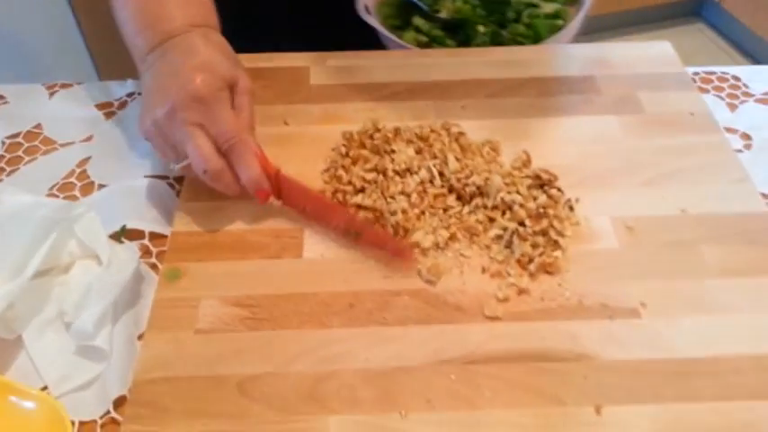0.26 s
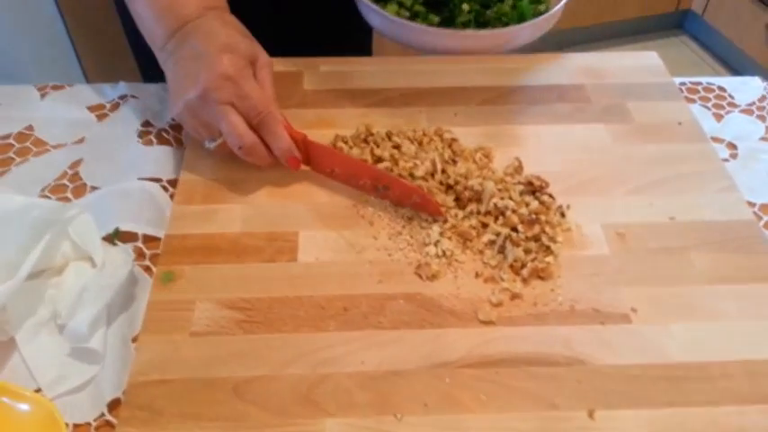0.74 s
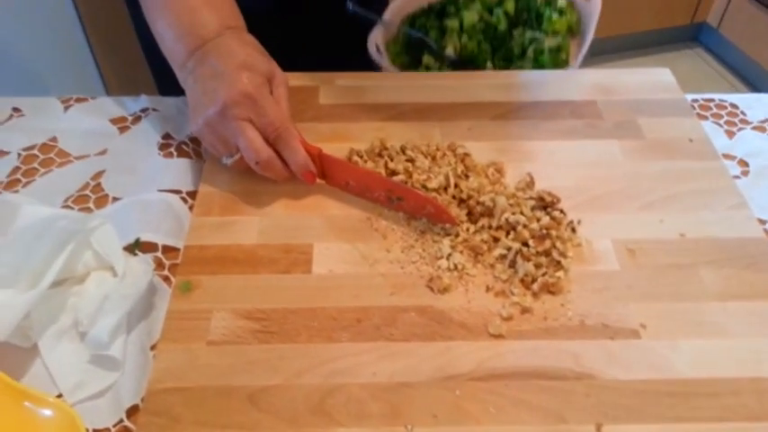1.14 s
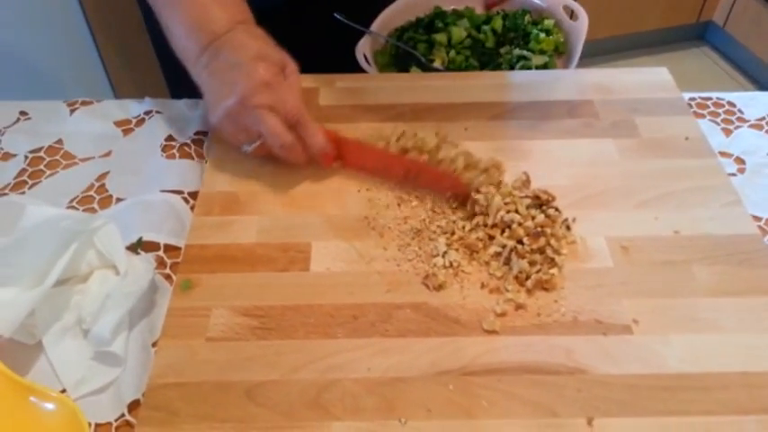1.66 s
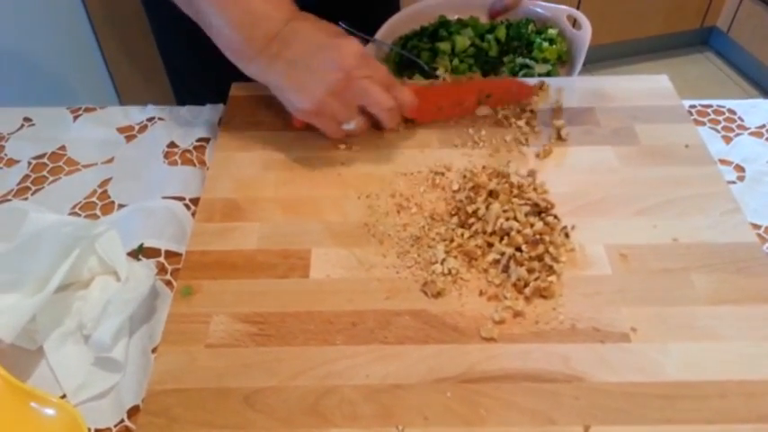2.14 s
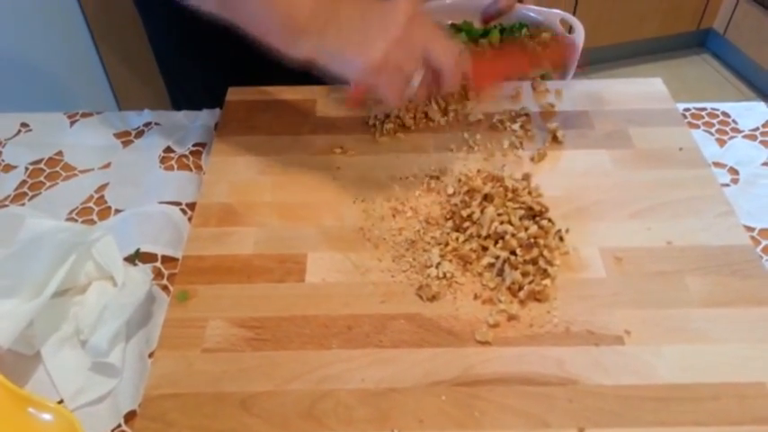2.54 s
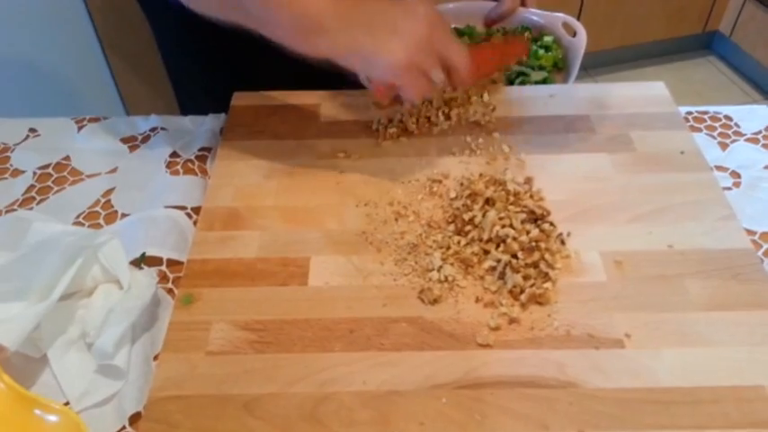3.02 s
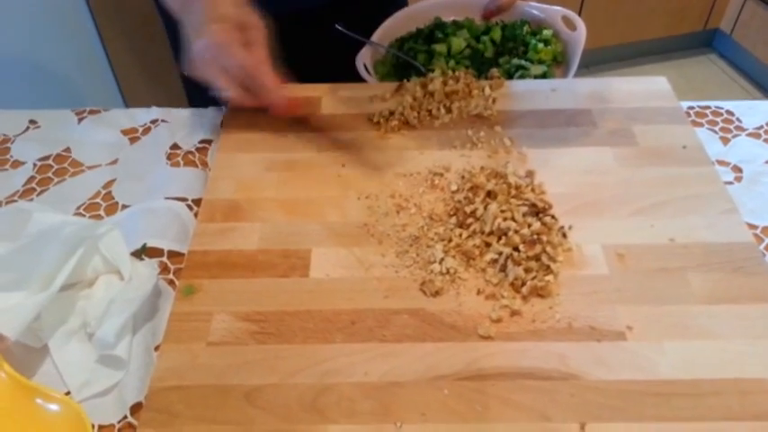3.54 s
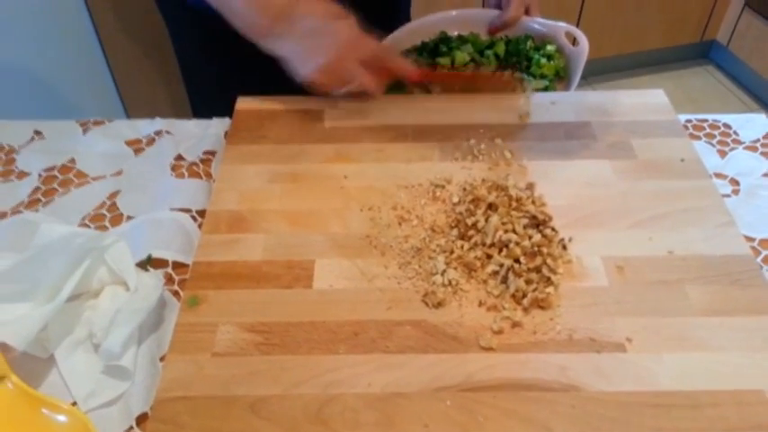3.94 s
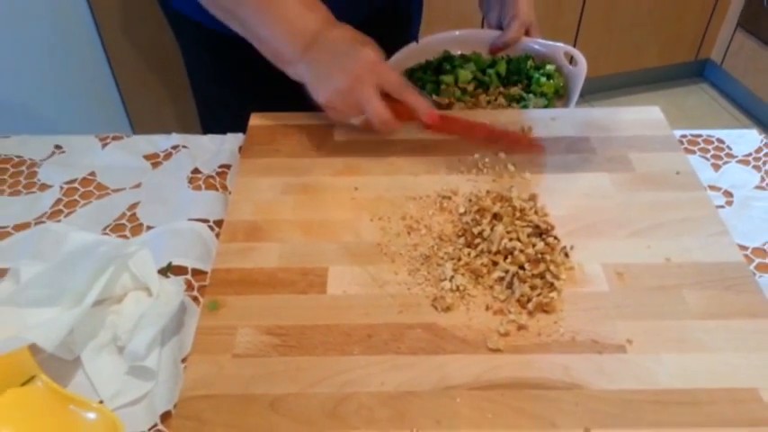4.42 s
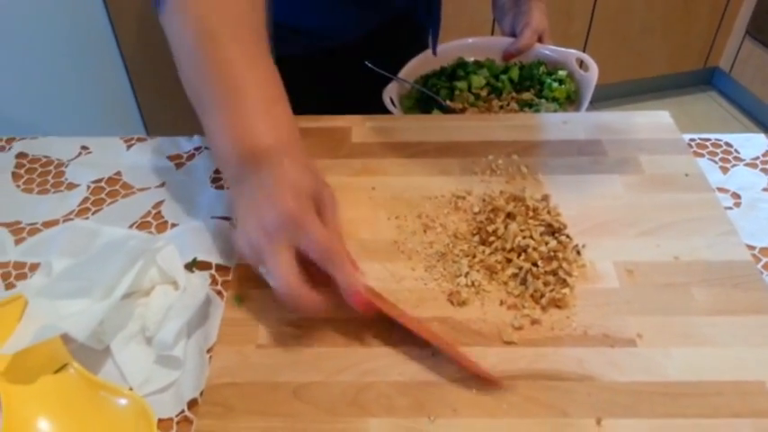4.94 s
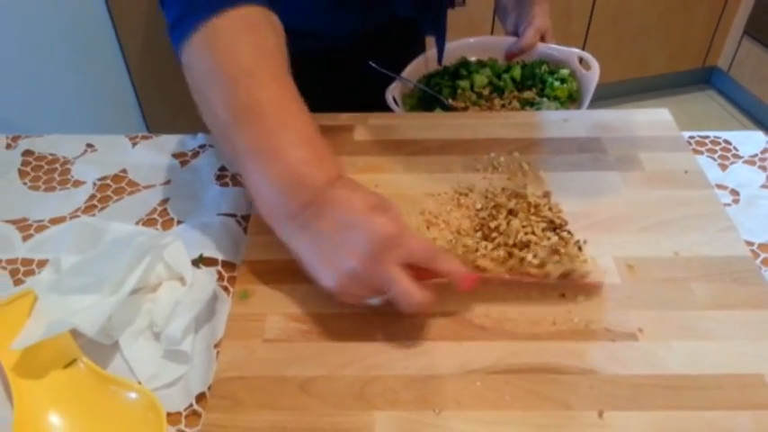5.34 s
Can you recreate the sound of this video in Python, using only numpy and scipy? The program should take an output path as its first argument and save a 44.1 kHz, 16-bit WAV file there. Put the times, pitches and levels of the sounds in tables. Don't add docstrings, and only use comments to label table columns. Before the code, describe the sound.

In a small kitchen with a steady low appliance hum, a steel blade scrapes chopped nuts over a wooden board. A short scrape and light clinks come first, then a near pause, longer rasping sweeps, delicate spoon-on-bowl clinks, a strong scrape with knocks, and finally a cluster of hard woody raps and another rasp. Close microphone, short room reverberation.

```python
import sys
import numpy as np
from scipy import signal
from scipy.io import wavfile

SR = 44100
rng = np.random.default_rng(int(sys.argv[2]) if len(sys.argv) > 2 else 0)


def master_out(mix):
    frames = np.transpose(np.atleast_2d(mix))
    ceiling = np.clip(frames, -1, 1)
    pcm = np.round(ceiling * 32767).astype(np.int16)
    wavfile.write(sys.argv[1], SR, pcm)


def ratio_of_db(decibels):
    return 10 ** (np.asarray(decibels, float) / 20)


N = 245637

STILL_DB = -98
# [f/Hz, width/Hz, level/dB]
BOARD_MODES = [(369, 11, -8.5), (488, 110, -7.5), (646, 26.4, -1), (699, 22, 1), (800, 38.5, 0),
               (898, 16, -6.5), (1086, 134, -9.5)]
PASS_ENDS = [1.3, 2.7, 3.3, 3.81, 4.8, 5.08, 5.385]
# [t/s, peak level/dB, top ring over it/dB]
SNAG_EVENTS = [(0.281, -26, -14), (0.31, -25, -14), (0.3342, -28.5, -21), (0.46, -36, -10),
               (0.4994, -45, -23), (0.5583, -27, -25), (0.601, -33, -20), (1.5153, -36, -6),
               (1.524, -36, -7), (1.5362, -37, -5), (1.555, -35, -6), (1.578, -29.5, -9), (1.6006, -30, -9),
               (1.621, -41, -2), (1.6594, -35, -11), (1.6894, -40, -9), (1.7284, -37, -14),
               (1.7504, -35, -18), (1.775, -23, -18), (1.796, -22, -21), (1.828, -26, -21),
               (1.853, -28, -18), (1.9031, -29, -12), (1.924, -28, -11), (2.7994, -38, -20),
               (2.8294, -41, -19), (2.868, -29, -20), (2.909, -28, -34), (3.532, -25, -14),
               (3.5787, -17, -17), (3.6594, -20, -21), (3.7094, -16, -22), (3.769, -28, -34),
               (3.8, -18, -30), (3.8205, -20, -26), (3.8444, -27, -23), (3.8701, -10, -21),
               (4.9644, -32, -33), (4.9844, -30, -26), (4.9994, -31, -23), (5.018, -20, -18),
               (5.0394, -18.5, -16.5), (5.3094, -33, -8), (5.33, -29, -14), (5.4196, -27, -16),
               (5.432, -15, -20), (5.459, -19, -27), (5.4894, -34, -27), (5.5328, -26, -22)]


def rms_one(x):
    return x / np.sqrt(np.mean(x ** 2) + 1e-20)


def drift(rate):
    knots = rng.standard_normal(400)
    return np.interp(np.arange(N) / SR * rate, np.arange(400), knots)


def resonate(x, peaks, wander_db=0., rate=7.4):
    out = 0
    for k, (hz, width_hz, db) in enumerate(peaks):
        radius = np.exp(-np.pi * width_hz / SR)
        b = (1 - radius ** 2) / 2 * np.array([1, 0, -1])
        a = [1, -2 * radius * np.cos(2 * np.pi * hz / SR), radius ** 2]
        drive = x * ratio_of_db(db + wander_db * drift(rate)[:len(x)])
        out = out + (-1) ** k * signal.lfilter(b, a, drive)
    return out


def band(x, low_hz, high_hz, order=2):
    edges = [low_hz, min(high_hz, .45 * SR)]
    return signal.sosfilt(signal.butter(order, edges, "band", fs=SR, output="sos"), x)


def coloured(spectrum, per_octave):
    hz, db = np.transpose(spectrum)
    edges = hz[0] * 2 ** np.arange(0, np.log2(hz[-1] / hz[0]), 1 / per_octave)
    white = rng.standard_normal((2, N + SR // 4))
    centres = edges * 2 ** (.5 / per_octave)
    gains = ratio_of_db(np.interp(np.log(centres), np.log(hz), db))
    out = 0
    for k, (low_hz, gain) in enumerate(zip(edges, gains)):
        out = out + gain * band(white[k % 2], low_hz, low_hz * 2 ** (1 / per_octave))
    return rms_one(out[-N:])


def strikes(times, db):
    clicks = np.zeros(N)
    clicks[(np.array(times) * SR).round().astype(int)] = ratio_of_db(db)
    return clicks


def catches(per_s, spread_db, clump_db):
    born = rng.random(N) < per_s / SR
    sizes = ratio_of_db(spread_db * np.minimum(rng.exponential(1, N), 5)) * rng.choice([-1, 1], N)
    return rms_one(born * sizes * ratio_of_db(clump_db * drift(60.)))


def contact(start, length, first_db, last_db):
    attack_s, release_db_per_s = .012, 242
    t = np.arange(0, N, 32) / SR - start
    glide = first_db + (last_db - first_db) * np.clip(t / length, 0, 1)
    db = glide - release_db_per_s * np.maximum(t - length, 0) + 40 * np.minimum(t / attack_s, 0)
    return ratio_of_db(np.maximum(2 * db, 2 * STILL_DB - 40))


def full_rate(curve):
    return np.interp(np.arange(N), np.arange(0, N, 32), curve)


def room_tone():
    # [f/Hz, level per Hz/dB]
    air_spectrum = [(240, -64), (400, -9.5), (942, -17.5), (1260, -24), (2790, -27), (4280, -35),
                    (13300, -36.5), (14800, -24), (15400, -79)]
    return ratio_of_db(-53) * coloured(air_spectrum, per_octave=1.99)


def rumble():
    # [t/s, level/dB]
    load = [(0.0, -36.5), (0.06, -43), (0.11, -34), (0.17, -34.5), (1.16, -35.5), (1.19, -27),
            (1.32, -34.5), (2.31, -33.5), (2.42, -29.5), (2.56, -34.5), (3.4, -28), (3.44, -36.5),
            (3.52, -26.5), (4.33, -34.5), (4.39, -29.5), (5.57, -28.5)]
    # [f/Hz, level per Hz/dB]
    drone = [(118, -9), (135, -7.5), (150, 4), (168, -8.5), (190, -3.5), (250, -9), (330, -16),
             (450, -30.5)]
    # [f/Hz, level per Hz/dB]
    deep_spectrum = [(36, -39), (48, -12), (58, -3.5), (76, -13), (95, 5.5), (112, -2), (125, -14.5)]
    # [t/s, level/dB, half length/s]
    shudders = [(0.074, -37, 0.048), (1.356, -40.5, 0.18), (1.658, -36.5, 0.058), (3.502, -42, 0.3),
                (4.26, -31, 0.11), (4.694, -26.5, 0.12), (4.967, -32.5, 0.023), (5.158, -42, 0.19),
                (5.557, -39, 0.14)]
    t = np.arange(N) / SR
    load_db = np.interp(t, *np.transpose(load))
    swell = sum(ratio_of_db(2 * db) * np.exp(-((t - s) / half) ** 2) for s, db, half in shudders)
    steady_db = -43.5 + 0.1 * (load_db - load_db.mean())
    deep = np.sqrt(ratio_of_db(2 * steady_db) + swell)
    return ratio_of_db(load_db - 1.0) * coloured(drone, per_octave=8) + deep * coloured(deep_spectrum, per_octave=6.2)


def swings(rows):
    out, t = np.zeros(N), np.arange(SR // 5) / SR
    for s, db, hz, t60 in rows:
        swell = np.minimum(t * hz * .6, 1)
        swing = swell * np.sin(2 * np.pi * hz * t) * (1 - 5 * t)
        out[round(s * SR):][:len(t)] += ratio_of_db(db - 60 * t / t60) * swing
    return out


def thumps():
    # [t/s, peak level/dB, f/Hz, t60/s]
    raps = [
        (0.109, -23, 301, 0.056),
        (1.1919, -16.5, 184, 0.069),
        (1.188, -30, 1050, .02),
        (1.719, -28, 330, .06),
        (4.41, -12, 1030, .012),
        (4.927, -15, 1000, 0.014),
        (5.1452, -16, 810, 0.018),
    ]
    return swings(raps)


def sings():
    # [t/s, peak level/dB, f/Hz, t60/s]
    brushed = [
        (0.96, -61, 3240, .5),
        (1.005, -62, 3238, .25),
        (1.724, -38, 5600, .06),
        (1.725, -40, 1990, .08),
        (4.988, -34, 4130, .06),
        (5.008, -32, 4140, .08),
        (5.054, -30, 4150, .04),
    ]
    return swings(brushed)


def bumps():
    # [t/s, level/dB, upper body/dB]
    handle_knocks = [
        (1.188, -22.5, -13),
        (3.384, -16, 4.5),
    ]
    # [f/Hz, width/Hz, level/dB]
    bump_body = [(1110, 350, 6.5), (1830, 200, 2)]
    out, t = 0, np.arange(SR // 4) / SR
    for s, db, upper_db in handle_knocks:
        burst = rng.standard_normal(len(t)) * (ratio_of_db(-60 * t / 0.0061) + ratio_of_db(-16.0 - 60 * t / 0.22))
        lower, (high_hz, high_width, high_db) = bump_body
        woody = resonate(burst, [lower, (high_hz, high_width, high_db + upper_db)])
        woody = band(woody, 800, 2200, order=4)
        out = out + signal.oaconvolve(strikes([s], db + 3), woody)[:N]
    return out


def creep():
    spoon_modes = [(2370, 40, 0), (4820, 90, -3)]   # f/Hz, width/Hz, level/dB
    power = full_rate(contact(start=0.88, length=0.22, first_db=-68, last_db=-70))
    slips = catches(300, spread_db=3., clump_db=3.)
    return np.sqrt(power) * rms_one(resonate(slips, spoon_modes, wander_db=3.))


def clinks():
    # [t/s, high ring peak/dB, low ring over it/dB, middle ring over it/dB, share of the free decay]
    touches = [(0.1084, -40, 0, 4, .6), (0.118, -37, 1, 4, .85), (0.133, -43, 4, -2, .9),
               (0.796, -60, -9, -12, .7), (2.163, -53, 5, 3, .7), (2.4838, -52, -6, 1, .3),
               (2.7263, -55, 4, 1, .35), (3.0377, -50, 0, 1, .9), (3.0648, -56, 5, 3, .6),
               (3.1094, -43, 1, -3, 1.), (3.1433, -52, -6, -12, .6), (3.197, -54, 5, 7, .6),
               (3.885, -55, 11, -6, .7), (4.0167, -46, 8, 6, 1.), (4.041, -52, 10, 2, 1.),
               (4.061, -51, 7, 1, 1.)]
    # [f/Hz, level/dB, t60/s]
    bowl_modes = [(1725, -9, .2), (1965, -8, .18), (2640, -3, .32), (2715, -4, .25), (2790, -11, .2),
                  (3130, -6, .15), (3580, 1, .17), (3855, -2, .11), (4880, 0, .29), (5085, -16, .25),
                  (5490, -9, .15), (5765, -3, .13), (6520, -3, .13), (7820, -6, .2)]
    tilted_until_s = .5
    tilt_frees = [(2790, 10), (3580, 2), (4880, 0), (5085, 15), (5490, -5), (7820, -6)]
    out, t = np.zeros(N + SR), np.arange(SR // 3) / SR
    short = t[:SR // 10]
    hz, mode_db, t60 = np.transpose(bowl_modes)[:, :, None]
    for s, db, low_db, middle_db, free in touches:
        luck = rng.standard_normal((3, len(bowl_modes), 1))
        noise = rng.standard_normal((2, len(short)))
        spot_db = np.where(hz < 3000, low_db, np.where(hz < 4400, middle_db, 0))
        if s < tilted_until_s:
            spot_db = spot_db + sum(gain_db * (hz == f) for f, gain_db in tilt_frees)
        phase = 2 * np.pi * hz * (1 + .002 * luck[1]) * t
        fade = -60 * t / (t60 * np.clip(free, .1, 1.5))
        twin = np.sin((1.006 + .002 * luck[2]) * phase) * ratio_of_db(fade / .75)
        pair = np.sin(phase) * ratio_of_db(fade) + .8 * twin
        chatter = .04 * noise[0] * ratio_of_db(-60 * short / .1)
        chatter[0] = 1
        ring = np.sum(ratio_of_db(spot_db + mode_db - 5.5 + 1.5 * luck[0]) * pair, axis=0)
        hit = signal.oaconvolve(ring, chatter)
        hit[:len(short)] += band(ratio_of_db(-6) * noise[1] * ratio_of_db(-60 * short / 0.03), 2300, 6800)
        out[round(s * SR):][:len(hit)] += ratio_of_db(db) * hit
    return out[:N]


def ticks():
    # [t/s, peak level/dB, f/Hz]
    pieces = [(0.2788, -50, 7330), (0.4384, -54, 8200), (0.7944, -57, 5430), (0.944, -50, 1950),
              (1.3456, -55, 7060), (1.5249, -55, 7050), (1.5554, -54, 5100), (1.5994, -48, 5460),
              (1.8944, -42, 8200), (1.954, -38, 5000), (2.0513, -38.5, 4600), (2.2114, -51, 6800),
              (2.3521, -51, 5600), (2.4066, -48.5, 7330), (2.4294, -53, 6900), (2.4548, -46, 5950),
              (2.5544, -59, 3620), (2.5944, -63, 3590), (2.7994, -43, 4100), (2.8684, -39.5, 2970),
              (2.9387, -41, 6060), (3.3268, -51.5, 6410), (4.9265, -18, 4210), (4.946, -22.5, 4010),
              (4.999, -38, 7800), (5.0578, -33, 4950), (5.061, -31, 2200), (5.232, -36, 5240),
              (5.294, -25, 7130), (5.3986, -46, 5150)]
    out, t = np.zeros(N), np.arange(SR // 20) / SR
    for s, db, hz in pieces:
        at = round(s * SR)
        ring = np.sin(2 * np.pi * hz * t) * ratio_of_db(-60 * t / 0.023)
        splinter = band(rng.standard_normal(len(t)) * ratio_of_db(-60 * t / 0.018), 1220, 4800)
        out[at:at + len(t)] += ratio_of_db(db + 4.0) * (ring + 1.8 * splinter)
    return out


def knocks():
    # [t/s, peak level/dB, clatter over it/dB, crack over it/dB, thud over it/dB]
    landings = [(0.106, -29.5, 0.5, 6, 7.5), (0.1134, -23.5, -12, -1, -8), (1.187, -24.5, -9.5, -5, 0),
                (1.717, -22.5, -23, -23, -33), (3.384, -14, -21, -16, -7.5), (3.734, -17, -5, 5, -9),
                (3.751, -12.5, -27, -11, -12), (3.884, -17, -13, 3, -10), (4.410, -10, 1.5, 1.5, -16),
                (4.44, -15, 2.5, 5.5, -18), (4.473, -10.5, -1, 3.5, -10), (4.499, -36, 5, -19, -21),
                (4.925, -16, 5, -7, -11), (4.939, -9, -1, -20, -6.5), (5.085, -1, -20.5, -14.5, -10),
                (5.1, -24, -17, 9, -3), (5.109, -16, 0.5, 1, -10), (5.123, -16, -3, -2, -33),
                (5.144, -3.5, -8, -11.5, -8), (5.157, -9, -28, -17, -6.5), (5.171, -18, -12, 0, 4.5),
                (5.232, -14.5, -23, -7.5, -27), (5.265, -4, -9, -7.5, -19), (5.292, -15.5, -36, 2, -8)]
    # [f/Hz, width/Hz, level/dB]
    free_blade = [(4010, 150, 0), (4450, 300, 3), (5200, 200, -15), (5400, 150, -10), (6300, 250, 3),
                  (7820, 150, -3), (8450, 110, 13), (9100, 100, -6), (10100, 300, 7), (11800, 200, -2),
                  (12300, 150, 0), (13750, 150, -8), (14150, 150, -10)]
    board_t60_s = 0.039
    out, t = np.zeros(N), np.arange(SR // 4) / SR
    for s, db, clatter_db, crack_db, thud_db in landings:
        at = round((s + .001) * SR)
        chance = rng.standard_normal((3, len(t)))
        wood = 0
        for k, (hz, _, mode_db) in enumerate(BOARD_MODES):
            wood = wood + ratio_of_db(mode_db + 2 * chance[0, k]) * np.sin(2 * np.pi * hz * t)
        wood = band(wood * ratio_of_db(-60 * t / board_t60_s), 355, 1080)
        thud = sum(np.sin(2 * np.pi * hz * t) for hz in (190, 280, 375)) * ratio_of_db(-60 * t / 0.041)
        clatter = chance[2] * (ratio_of_db(-60 * t / 0.011) + ratio_of_db(-16.0 - 60 * t / 0.065))
        clatter = band(clatter, 570, 2196, order=4)
        burst = chance[1] * (ratio_of_db(-60 * t / 0.02) + ratio_of_db(-38 - 60 * t / 0.032))
        crack = band(burst, 1930, 6640) + ratio_of_db(-9.0) * resonate(burst, free_blade)
        hit = ratio_of_db(-10.5) * wood + ratio_of_db(thud_db - 6.5) * thud
        hit = hit + ratio_of_db(clatter_db + 11.0) * clatter + ratio_of_db(crack_db - 1.5) * crack
        out[at:at + len(t)] += ratio_of_db(db) * hit[:N - at]
    return out


def stroke_curves():
    # [t/s, length/s, first drag/dB, last drag/dB, weight on the board/dB]
    sweeps = [(0.0, 0.12, -43.5, -51.5, 0.5), (0.17, 0.09, -46, -46.5, -14), (0.262, 0.034, -41, -37, -2.5),
              (0.3, 0.18, -42.5, -47.5, 3), (0.43, 0.16, -41, -42, 2), (1.52, 0.17, -48.5, -39.5, 2),
              (1.72, 0.13, -35.5, -33.5, -0.5), (1.89, 0.055, -35.5, -32, -4.5),
              (1.99, 0.19, -41.5, -46, 0), (2.2, 0.12, -42.5, -51, -5), (2.38, 0.23, -48.5, -57, -7),
              (2.78, 0.084, -43, -39.5, -3), (2.88, 0.15, -40, -57, -2), (3.48, 0.063, -52.5, -31.5, -4),
              (3.55, 0.18, -32, -29.5, -3.5), (3.72, 0.12, -29, -34.5, 6.5), (3.82, 0.039, -30, -28, -20),
              (3.88, 0.15, -51, -41.5, -9), (4.44, 0.013, -33, -46, 18), (5.1, 0.074, -48, -40, 19),
              (5.29, 0.082, -30, -38, 7), (5.385, 0.28, -34, -29, 3)]
    # [t/s, length/s, first drag/dB, last drag/dB, weight on the board/dB]
    slides = [(0.125, 0.15, -46.5, -51, 2.5), (0.795, 0.057, -49.5, -54.5, 0),
              (0.87, 0.36, -54.5, -66, 3.5), (1.2, 0.1, -44, -67, -4), (1.34, 0.04, -65, -65, 2),
              (2.725, 0.059, -44.5, -53, -4), (3.04, 0.37, -47, -70, -4), (4.02, 0.25, -35.5, -77, -10.5),
              (4.416, 0.029, -50, -44, 17), (4.45, 0.067, -41, -37.5, 14.5), (4.495, 0.43, -47, -76, 12.5),
              (4.95, 0.12, -32.5, -35.5, 7), (5.23, 0.013, -36, -41, 1), (5.275, 0.019, -36, -51, 16)]
    bite, bite_pivot_db = 0.98, -41
    nuts_follow = 0.47
    # strokes, top ring and nuts under the drag/dB, share of the fade that board and nuts take
    kinds = [(sweeps, -11.5, -4.5, 1), (slides, -18, -3.5, 0.79)]
    power = ratio_of_db(2 * STILL_DB)
    for rows, top_db, nuts_db, settle in kinds:
        for s, length, first_db, last_db, weight_db in rows:
            drag = contact(s, length, first_db, last_db)
            load = contact(s, length, first_db, first_db + settle * (last_db - first_db))
            top = drag * (drag / ratio_of_db(2 * bite_pivot_db)) ** (bite - 1)
            gains = ratio_of_db(2 * np.array([0, weight_db, nuts_db + nuts_follow * weight_db, top_db]))
            power = power + gains[:, None] * np.array([drag, load, load, top])
    jerk = 1.2 * drift(40)
    return [jerk + full_rate(10 * np.log10(p)) for p in power]


def snag_bursts(db, t60):
    t = np.arange(SR // 50) / SR
    clicks = strikes(np.array(SNAG_EVENTS)[:, 0], db)
    return signal.oaconvolve(clicks, ratio_of_db(-60 * t / t60))[:N] * rng.standard_normal(N)


def blade_ring(slips, pluck):
    # [f/Hz, width/Hz, level/dB]
    first = [(1970, 32, 1.5), (3280, 34, -22), (4150, 57, -16), (6300, 110, 1), (7330, 100, -2),
             (7580, 42, 6.5), (8380, 150, 7)]
    flat = [(1950, 80, 1.5), (3360, 65, -2.5), (4060, 68, -2), (4220, 110, -9), (5600, 370, 0.5),
            (7330, 290, -10), (7430, 49, 8), (8460, 72, 2)]
    away = [(2950, 53, -3), (4100, 80, -4), (5040, 150, 0), (6500, 43, 8.5), (7630, 120, 3),
            (8300, 160, -13)]
    middle = [(4040, 84, 2.5), (4540, 120, -5), (5130, 82, -1.5), (5470, 150, -8), (6410, 91, 5),
              (7930, 150, -6), (8160, 90, -6)]
    rim = [(3900, 160, -5), (5490, 95, -6), (6360, 130, -1.5), (7540, 50, -9), (7650, 130, -7),
           (8380, 60, 7.5)]
    tip = [(4100, 87, 3), (5100, 200, -0.5), (6500, 130, -9), (7360, 60, -10), (7760, 60, 2)]
    steep = [(4000, 150, -2), (4560, 61, 0), (5150, 150, 4), (7050, 110, 1), (6440, 160, -9),
             (7950, 190, 8), (8600, 78, -18)]
    last = [(3200, 60, -12), (4180, 96, 3), (4700, 55, 0.5), (5230, 120, 2), (6460, 70, -1), (6660, 67, -7),
            (7850, 140, -28)]
    grips = [first, flat, away, middle, rim, tip, steep, last]
    ends = [0] + [round(s * SR) for s in PASS_ENDS] + [N]
    passes = []
    for a, b, modes in zip(ends, ends[1:], grips):
        sung = rms_one(resonate(slips[a:b], modes, wander_db=2.6, rate=18.))
        plucked = resonate(pluck[a:b], modes, wander_db=3., rate=40.)
        passes.append((sung, plucked))
    return np.concatenate(passes, axis=1)


def blade_top(x):
    # [f/Hz, width/Hz, level/dB]
    flat_modes = [(9800, 250, -4), (10200, 300, 2), (11800, 300, 4), (12350, 300, 0), (13720, 250, 4),
                  (14200, 350, 4)]
    # [f/Hz, width/Hz, level/dB]
    top_modes = [(9800, 200, 1), (10200, 300, -1), (11800, 450, 4), (12350, 260, 3.5), (13750, 250, 3),
                 (14200, 350, 6.5)]
    t = np.arange(N) / SR
    is_flat = (t > PASS_ENDS[0]) & (t < PASS_ENDS[1])
    flat_ring = resonate(resonate(x, flat_modes), flat_modes, wander_db=2.6, rate=14.)
    other_ring = resonate(resonate(x, top_modes), top_modes, wander_db=2.6, rate=14.)
    return np.where(is_flat, flat_ring, other_ring)


def scraping():
    # [f/Hz, width/Hz, level/dB]
    grain = [(3280, 410, -1.5), (4364, 1360, 2.5), (4920, 1180, 4), (5840, 1140, 4), (6850, 3860, 1.5),
             (8200, 3450, -4.5)]
    # [f/Hz, width/Hz, level/dB]
    board_high = [(1166, 400, 6), (1530, 430, 3), (1798, 150, 4), (2080, 200, 9), (2430, 400, 6),
                  (3070, 150, 2)]
    pressed_db, loose_db = -48, -66.5
    lifted_from_s, lifted_to_s = 3.98, 4.4
    edge_db, body_db, nuts_db, top_db = stroke_curves()
    pressed = np.clip((top_db - loose_db) / (pressed_db - loose_db), .1, 1)
    pressed[round(lifted_from_s * SR):round(lifted_to_s * SR)] = .1

    slips = catches(3000, spread_db=3.4, clump_db=2.8)
    crumbs = catches(4500, spread_db=3.1, clump_db=1.8)
    rasp = band(resonate(crumbs, grain, wander_db=1., rate=14.), 2700, 9000, order=4)

    _, snag_db, snag_top_db = np.transpose(SNAG_EVENTS)
    grit = snag_bursts(snag_db, t60=0.031)
    sung, plucked = blade_ring(slips, grit)
    snag_top = blade_top(snag_bursts(snag_db + snag_top_db, t60=0.02))
    snags = ratio_of_db(-26.0) * band(grit, 1200, 8400) + ratio_of_db(3.0) * plucked + ratio_of_db(11.5) * snag_top

    edge = 1.04 * pressed * sung + ratio_of_db(-1.5) * rms_one(rasp)
    top = pressed * rms_one(blade_top(slips))
    top = top + ratio_of_db(-5.0) * rms_one(band(crumbs, 6940, 10760, order=6))
    body = rms_one(resonate(slips + crumbs, BOARD_MODES, wander_db=1.6, rate=14.))
    nuts = rms_one(resonate(crumbs, board_high, wander_db=2.5, rate=15.0))
    nuts = nuts + ratio_of_db(-2.0) * rms_one(band(slips, 1190, 2400, order=3))
    steel = ratio_of_db(edge_db - 5.0) * edge + ratio_of_db(top_db + 6.0) * top
    return snags + steel + ratio_of_db(body_db - 5.0) * body + ratio_of_db(nuts_db - 5.5) * nuts


def kitchen(x):
    # [f/Hz, t60/s, level/dB]
    room_bands = [(294, 0.33, 5.5), (642, 0.4, 2.5), (1540, 0.48, 0), (3130, 0.39, 2), (5500, 0.37, -2),
                  (11900, 0.35, 1)]
    t = np.arange(SR // 2) / SR
    white = rng.standard_normal((2, len(t)))
    tail = 0
    for k, (hz, t60, db) in enumerate(room_bands):
        tail = tail + ratio_of_db(db - 60 * t / t60) * band(white[k % 2], hz / 1.52, hz * 1.77)
    tail = tail * np.clip(t / 0.0087 - .3, 0, 1)
    return signal.oaconvolve(x, tail / np.sqrt(np.sum(tail ** 2)))[:N]


def scene():
    hits = knocks() + clinks() + ticks() + bumps() + creep() + thumps() + sings()
    rub = scraping()
    reverb = ratio_of_db(-6.5) * kitchen(hits + 0.71 * rub)
    return (hits + rub + reverb + rumble() + room_tone())[None]


def low_pass(x):
    return signal.sosfilt(signal.butter(12, 15600, fs=SR, output="sos"), x)


def record(dry):
    heard = band(dry, 46, 11130, order=3)
    heard = signal.sosfilt(signal.butter(12, 14600, fs=SR, output="sos"), heard)
    limited = .5 * np.tanh(heard / .5)
    return low_pass(limited)


dry = scene()
out = record(dry)
master_out(out)
```